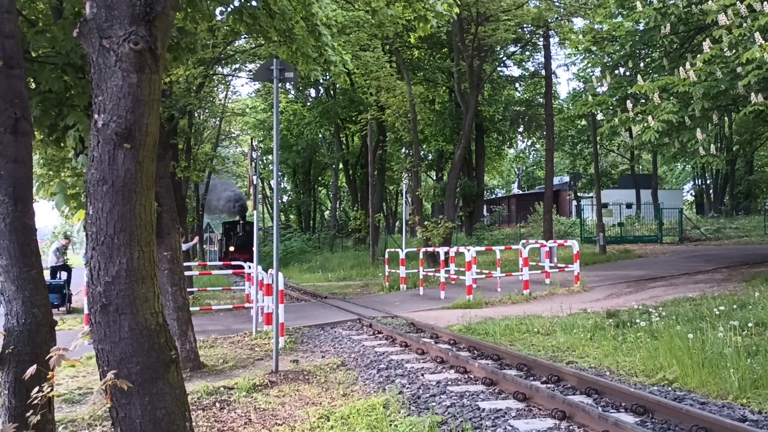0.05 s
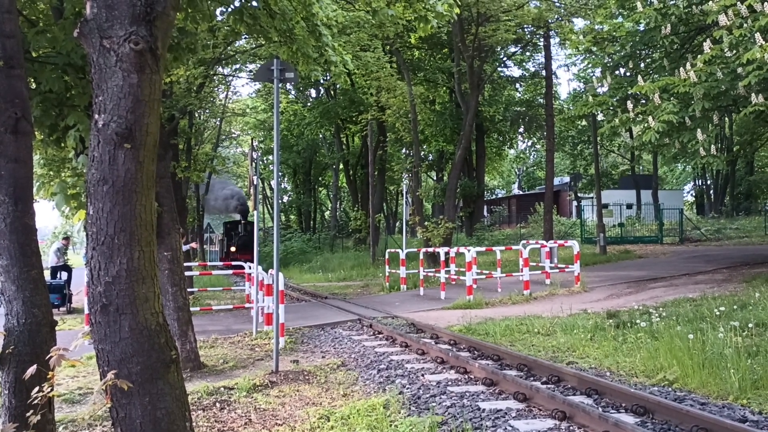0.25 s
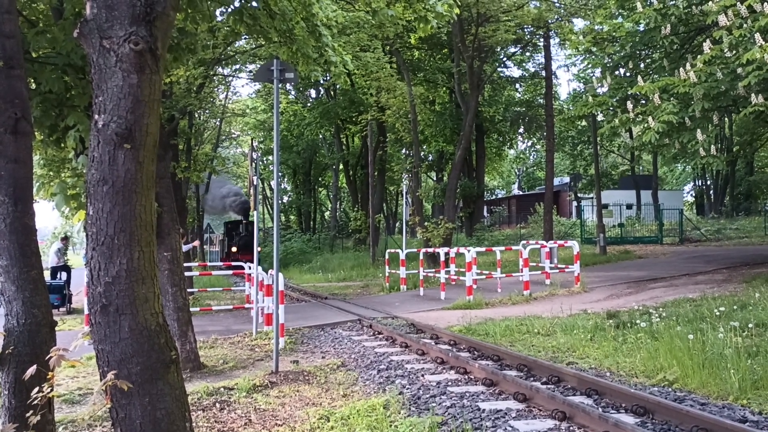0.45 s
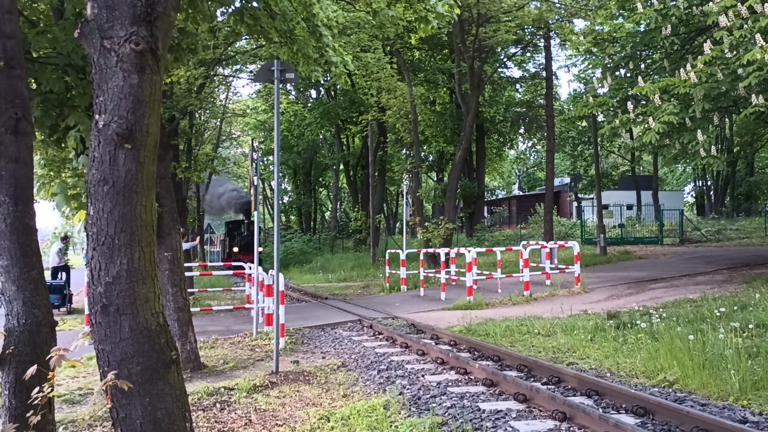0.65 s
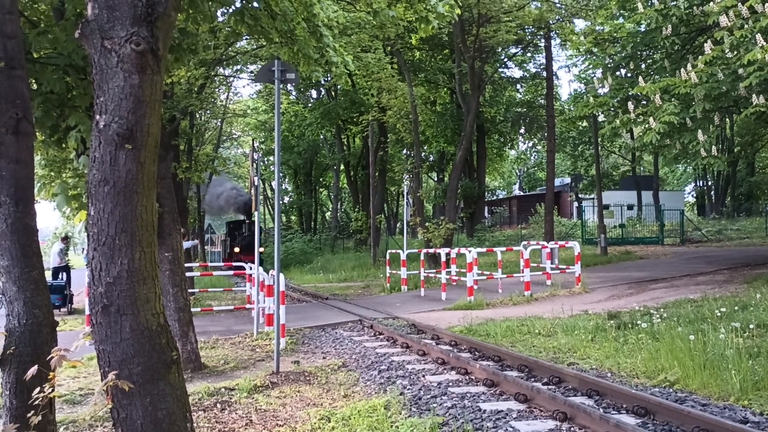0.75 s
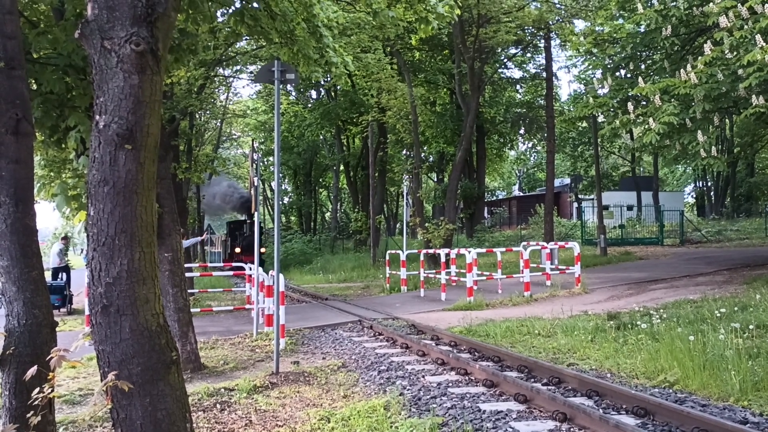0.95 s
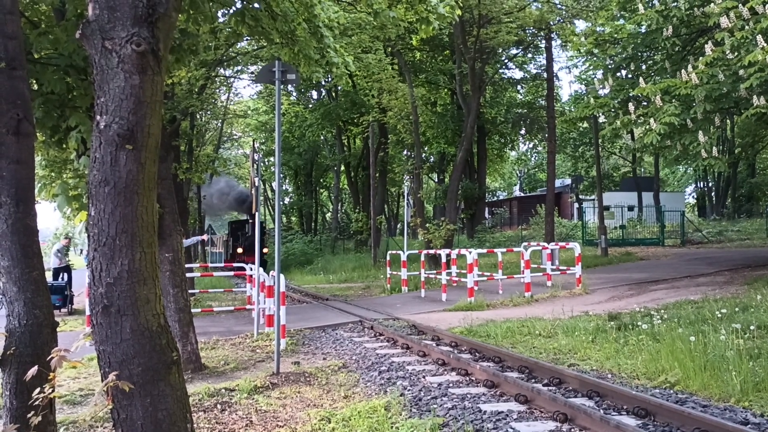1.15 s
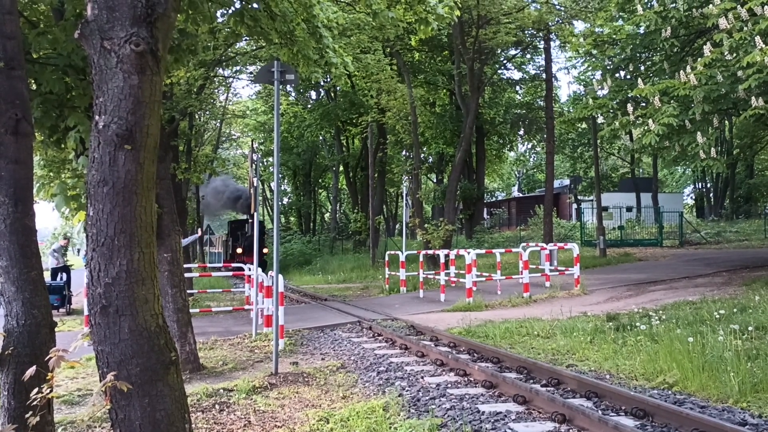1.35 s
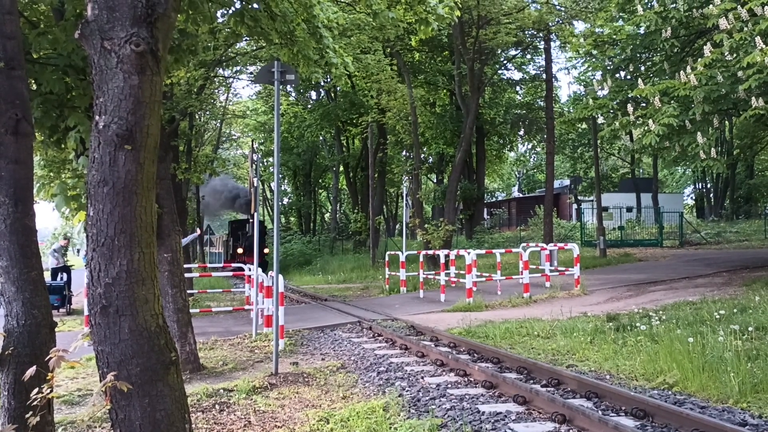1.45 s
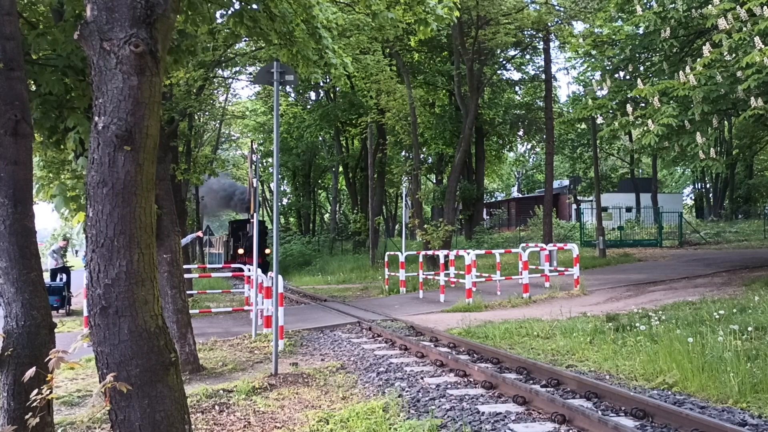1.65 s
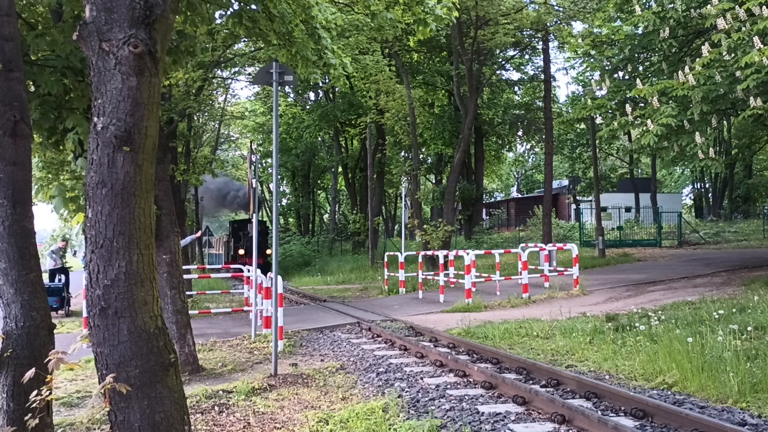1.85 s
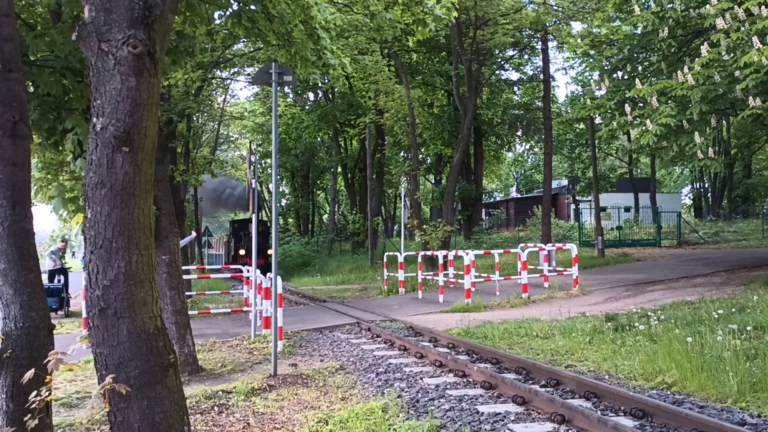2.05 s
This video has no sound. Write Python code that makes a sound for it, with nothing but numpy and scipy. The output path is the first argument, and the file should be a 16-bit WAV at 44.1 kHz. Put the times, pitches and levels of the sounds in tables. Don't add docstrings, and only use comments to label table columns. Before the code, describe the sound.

A small steam engine's whistle gives a long wavering blast and then a short one, with loud steam hiss, a late echo and woodland reverberation, over soft train rumble, picked up outdoors in stereo at a distance.

```python
import sys
import numpy as np
from scipy import signal
from scipy.fft import rfft, irfft
from scipy.io import wavfile
from scipy.ndimage import uniform_filter1d, map_coordinates

SR = 44100
rng = np.random.default_rng(int(sys.argv[2]) if len(sys.argv) > 2 else 0)


def persist_wave(psi):
    counts = np.round(np.clip(psi, -1, 1) * 32767).astype(np.int16)
    wavfile.write(sys.argv[1], SR, np.atleast_2d(counts).T)


def linear_from_db(decibels):
    return 10 ** (np.asarray(decibels, float) / 20)


N = 92610


def evened(x):
    return x / np.sqrt(np.mean(x ** 2) + 1e-20)


def read(points, hz):
    f, value = np.transpose(points)
    return np.interp(np.log(hz + 1), np.log(f + 1), value)


def resonate(x, hz, width):
    turn = np.exp(2j * np.pi * np.cumsum(hz * np.ones(len(x))) / SR)
    r = np.exp(-np.pi * width / SR)
    return 2 * (turn * signal.lfilter([1 - r], [1, -r], x / turn + 1e-18)).real


def fuzzy(x, hz, width):
    return evened(resonate(resonate(x, hz, width), hz, width))


def speaking(x, hz, width):
    ring = signal.hilbert(fuzzy(x, hz, width))
    steadiness = 0.6
    return evened((ring / (abs(ring) + 0.071) ** steadiness).real)


def noise(shape, like, patchy_db, flicker_db):
    frames, hz = N // 128 + 6, np.fft.rfftfreq(512, 1 / SR)
    a, b, c, d, patches = rng.standard_normal((frames, 257, 5)).T
    patches = uniform_filter1d(patches, size=5, axis=0)
    patches = evened(uniform_filter1d(patches, size=20, axis=1))
    flicker = evened(uniform_filter1d(rng.standard_normal(frames), size=3))
    same = np.clip(read(like, hz), -1, 1)[:, None]
    left = a + 1j * b
    right = same * left + np.sqrt(1 - same ** 2) * (c + 1j * d)
    z = np.array([left, right]) * linear_from_db(patchy_db * patches + flicker_db * flicker)
    x = signal.istft(z, nperseg=512, noverlap=384)[1][:, :N]
    return evened(irfft(rfft(x) * linear_from_db(read(shape, np.fft.rfftfreq(N, 1 / SR))), N))


def rumble():
    # frequency in Hz, level in dB per Hz.
    spectrum = [(25, -40), (55, -13), (130, -6), (260, -22.5), (400, -27.5), (1500, -24.5), (3000, -32.5),
                (16000, -43.5)]
    # frequency in Hz, left-right likeness from 0 to 1.
    likeness = [(60, 0.95), (150, 1), (300, .8), (1000, 0.98), (8000, 0.069)]
    return linear_from_db(-51) * noise(spectrum, likeness, patchy_db=1.0, flicker_db=0.3)


def drone():
    # frequency in Hz, width in Hz, level in dB.
    hums = [
        (65, 12, -53),
        (110, 8.7, -58.5),
    ]
    return sum(linear_from_db(db) * fuzzy(rng.standard_normal(N), hz, width) for hz, width, db in hums)


def joints():
    # time in seconds, level in dB, pitch in Hz.
    thumps = [
        (0.272, -49.5, 70),
        (1.128, -44.5, 105),
        (1.252, -44.5, 109),
        (1.47, -46, 64),
        (1.599, -37.5, 106.5),
        (1.749, -49, 110),
        (1.942, -37.5, 98.9),
        (1.988, -57, 65),
    ]
    t, out = np.arange(N) / SR, np.zeros(N)
    knock = evened(resonate(rng.standard_normal(N), 130, 93))
    for s, db, hz in thumps:
        u = np.maximum(t - s + 0.029, 0) / 0.024
        tone = np.sin(2 * np.pi * hz * (t - s))
        out += linear_from_db(db) * u * np.exp(1 - u) * (1.54 * tone + 0.5 * knock)
    return out


def clanks():
    # time in seconds, level in dB, pitch in Hz.
    hits = [
        (.11, -52, 1520),
        (1.46, -56, 1500),
        (1.95, -52, 1550),
    ]
    t, grit, out = np.arange(N) / SR, rng.standard_normal(N), np.zeros(N)
    for s, db, hz in hits:
        attack = np.clip((t - s) / 0.0095, 0, 1)
        decay = linear_from_db(-200 * np.maximum(t - s, 0))
        out += linear_from_db(db) * fuzzy(grit, hz, 240) * attack * decay
    return out


def bell():
    # frequency in Hz, level in dB, time to fall 60 dB in seconds.
    modes = [
        (1445, -57, .9),
        (2717, -54, 2.0),
        (2650, -60, 1.2),
        (4350, -56, .9),
        (4255, -62, .9),
    ]
    # time in seconds, level in dB, pitch ratio.
    strokes = [
        (-.05, 3, 1.0),
        (1.04, -1, 1.009),
    ]
    t, out = np.arange(N) / SR, np.zeros(N)
    for s, stroke_db, ratio in strokes:
        u = np.maximum(t - s, 0)
        attack = np.minimum(u / 0.01, 1)
        for hz, db, t60 in modes:
            ring = np.sin(2 * np.pi * hz * ratio * u + 6 * rng.random())
            ring = ring + 0.6 * fuzzy(rng.standard_normal(N), hz * ratio, 60)
            out += attack * linear_from_db(db + stroke_db - 60 * u / t60) * ring
    return out


def jet(steam_db):
    # frequency in Hz, level in dB per Hz.
    spectrum = [(300, -38), (450, -16), (600, -2.5), (2000, -4), (4000, -0.5), (6500, 1), (10000, -8),
                (16000, -13.5)]
    # frequency in Hz, left-right likeness from 0 to 1.
    likeness = [(400, .8), (1000, 0.88), (4000, 0.23), (12000, 0.092)]
    fizz_hz, fizz_share = 8100, 0.27
    hiss = noise(spectrum, likeness, patchy_db=1.5, flicker_db=1.0)
    fizz = irfft(rfft(hiss) / (1 + (fizz_hz / (np.fft.rfftfreq(N, 1 / SR) + 1)) ** 6), N)
    return linear_from_db(-33.5 + steam_db) * (hiss - fizz + fizz * linear_from_db(fizz_share * steam_db))


def whistle():
    # time in seconds, pitch in Hz, first, third and fifth mode in dB, steam pressure in dB.
    long_blast = [(0.166, 644.6, -92, -100, -100, -39.5), (.215, 651.5, -25.5, -52.5, -73, -10),
                  (0.269, 652, -31, -34, -68, -5.5), (0.402, 656.6, -28, -30, -43.5, -3),
                  (0.501, 670.5, -25, -29, -35, 0), (0.631, 677.9, -24, -28, -40, 2.5),
                  (0.659, 680.9, -26, -22, -26.5, 1.5), (.71, 675.3, -32, -21, -35, 0),
                  (0.749, 671.7, -30, -23.5, -37.5, 2), (0.808, 671.8, -33.5, -25.5, -48, -3),
                  (0.852, 665.4, -23.5, -26.5, -58, -9.5), (0.979, 659.5, -15.5, -44.5, -73, -20.5),
                  (1.15, 651.5, -27, -49, -74.5, -16.5), (1.242, 651, -25.5, -56, -84, -22),
                  (1.286, 642, -63, -68.5, -94, -32.5), (1.324, 630, -27, -61.5, -82, -45),
                  (1.471, 627.6, -29, -58.5, -84, -23), (1.556, 619, -36, -75, -94.5, -39.5)]
    short_blast = [
        (1.584, 673.2, -25, -44, -41.5, -13),
        (1.62, 665.2, -18.5, -31, -37.5, -0.5),
        (1.657, 655.5, -30.5, -38.5, -24.5, -1),
        (1.689, 668, -44, -30.5, -33.5, -0.5),
        (1.735, 663.6, -39, -31.5, -32, -5.5),
        (1.765, 663, -51, -31.5, -42, -23),
        (1.799, 655, -40, -60, -49, -30),
        (1.929, 652, -48.5, -84, -50, -47),
        (2.1, 653, -51, -87, -61.5, -53.5),
    ]
    # multiple of the pitch, dB under the first mode, dB under the third mode.
    even_harmonics = [
        (2, -30.5, -19),
        (4, -33, -17),
    ]
    # multiple of the pitch, width in Hz, level in dB.
    breathy = [(1.0, 10, -42), (5.03, 50, -46.5), (3.35, 60, -51), (2.0, 23, -49.5), (.85, 36, -52),
               (1.6, 53, -58.5)]
    t = np.arange(N) / SR
    s, *cols = np.transpose(long_blast + short_blast)
    hz, first, third, fifth, steam = (np.interp(t, s, c) for c in cols)
    turbulence = rng.standard_normal((len(breathy) + 3, N))

    wobble_hz = 2.78 * evened(uniform_filter1d(turbulence[0], size=900))
    phase = 2 * np.pi * np.cumsum(hz + wobble_hz) / SR
    first_level = np.interp(t, s, linear_from_db(cols[1] / 2)) ** 2
    low = np.sqrt(2) * first_level * np.sin(phase)

    lock = np.clip(1 + (third + 24) / 6, 0, 1)
    locked = lock * np.sqrt(2) * np.sin(3 * phase)
    fuzz = (1 - lock + lock * linear_from_db(-9)) * speaking(turbulence[1], 2.99 * hz, 70)
    high = linear_from_db(third) * (locked + fuzz)
    high = high + linear_from_db(fifth) * speaking(turbulence[2], 3190 + 2.5 * (hz - 665), 35)
    for k, first_db, third_db in even_harmonics:
        from_first = linear_from_db(first + first_db) * np.clip((hz - 640) / 15, 0, 1)
        from_third = lock * linear_from_db(third + third_db)
        high = high + (from_first + from_third) * np.sin(k * phase)
    for grain, (k, width, db) in zip(turbulence[3:], breathy):
        high = high + linear_from_db(steam + db) * fuzzy(grain, k * hz, width)
    return low, high, jet(steam)


def wall(x):
    delay_s, recede = 0.135, 0.025
    tilt_db = -9
    t = np.arange(N) / SR
    late = map_coordinates(x, [(t - delay_s - recede * t) * SR], order=3)
    return irfft(rfft(late) * linear_from_db(tilt_db * (np.fft.rfftfreq(N, 1 / SR) / 6000) ** 2), N)


def echoes(low, high, hiss):
    # time in seconds, level in dB.
    path = [(.3, 1.5), (.6, -6), (0.799, 2.5), (.92, -0.5), (1.102, -16), (1.3, -20.5), (1.699, -17),
            (1.789, 2.5), (1.859, 6), (1.89, -10.5)]
    s, db = np.transpose(path)
    tone = wall(low) * linear_from_db(np.interp(np.arange(N) / SR, s, db))
    left = wall(linear_from_db(-5 + 2.5) * high + linear_from_db(-6.5) * hiss[1])
    right = wall(linear_from_db(-5 - 2.5) * high + linear_from_db(-6.5) * hiss[0])
    return tone + np.array([left, right])


def trees(x):
    # frequency in Hz, time to fall 60 dB in seconds.
    decay = [(600, 0.74), (2000, 1), (5000, 0.6), (10000, 0.37)]
    taps = np.zeros((2, 2 * SR))
    at = np.arange(400, 2 * SR - 20, 20)
    at = at + rng.integers(0, 20, (2, len(at)))
    np.put_along_axis(taps, at, rng.choice([-1., 1.], at.shape), 1)
    hz, t, z = signal.stft(taps, SR, nperseg=256)
    tail = signal.istft(z * linear_from_db(-60 * t / read(decay, hz)[:, None]), SR, nperseg=256)[1]
    return signal.fftconvolve(x[None], tail / np.linalg.norm(tail[0]), axes=1)[:, :N]


def ducking(x):
    threshold_db, share, recover_db_s = -33, 0.45, 54.5
    power_db = 10 * np.log10(abs(uniform_filter1d((x ** 2).mean(0), size=2000)) + 1e-12)
    fall = np.arange(N) * recover_db_s / SR
    held_db = np.maximum.accumulate(power_db + fall) - fall
    over_db = np.maximum(held_db - threshold_db, 0)
    return linear_from_db(-share * uniform_filter1d(over_db, size=800))


def scene():
    low, high, hiss = whistle()
    ding = bell()
    near = low + high + clanks()
    near = np.array([near + np.roll(ding, shift=4), near + ding])
    echo = echoes(low, high, hiss)
    wet = trees(linear_from_db(-12) * low + linear_from_db(-7) * (high + hiss[0]))
    floor = rumble() + joints() + drone()
    direct = near * linear_from_db([[0.6], [-0.6]]) + hiss
    background = floor * linear_from_db([[1.1], [-0.9]]) * ducking(near)
    return direct + echo * linear_from_db([[-2], [2]]) + wet + background


def roll_off(x):
    return signal.sosfilt(signal.butter(12, 16920, fs=SR, output="sos"), x)


def record(dry):
    # frequency in Hz, microphone gain in dB.
    mic = [(6800, 0), (7300, -8), (8100, -9), (9200, -3.5), (11500, -10.5), (13700, -18), (14600, -4.5),
           (15700, -9.5)]
    edge_hz, lag = 15750, 4.5
    hz = np.fft.rfftfreq(2 * N, 1 / SR)
    delay = np.exp(-2j * np.pi * hz * lag / SR * np.array([[0], [1]]))
    colour = linear_from_db(read(mic, hz)) * (hz < edge_hz) * delay
    return roll_off(irfft(rfft(dry, 2 * N) * colour)[:, :N])


dry = scene()
out = record(dry)
persist_wave(out)
```